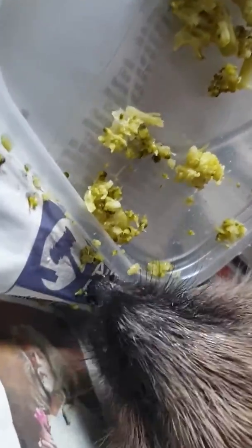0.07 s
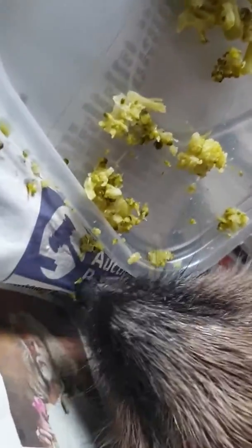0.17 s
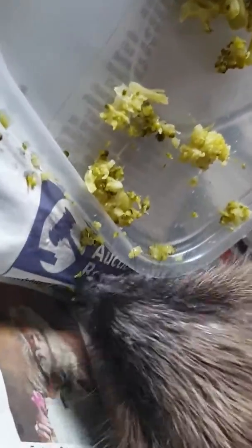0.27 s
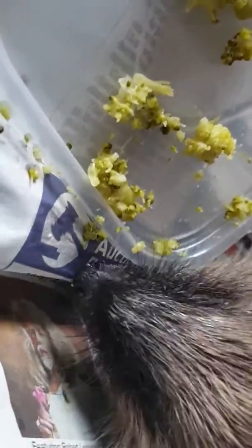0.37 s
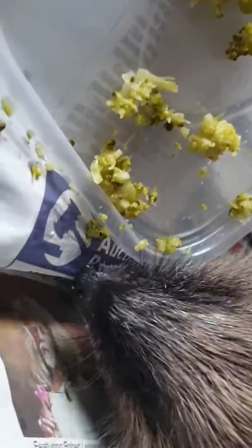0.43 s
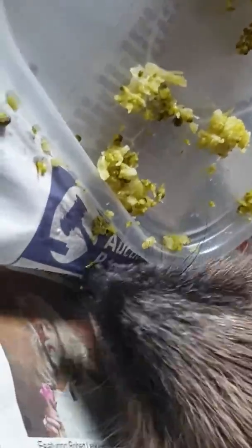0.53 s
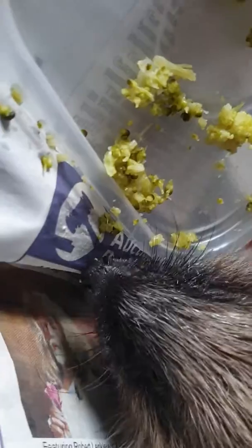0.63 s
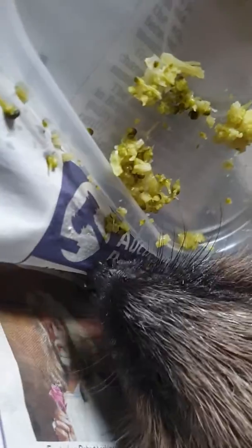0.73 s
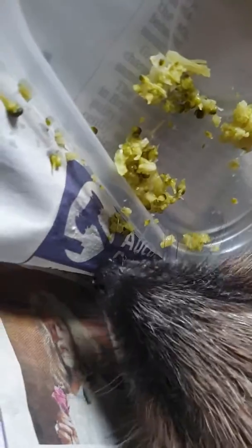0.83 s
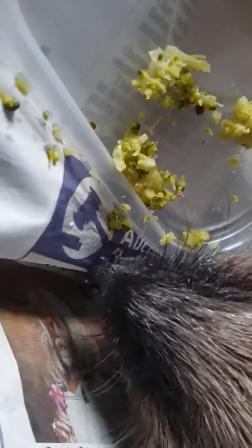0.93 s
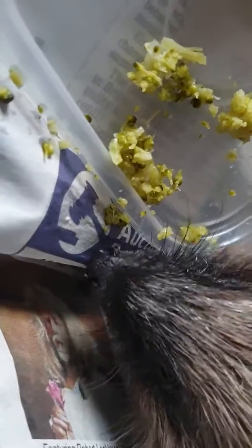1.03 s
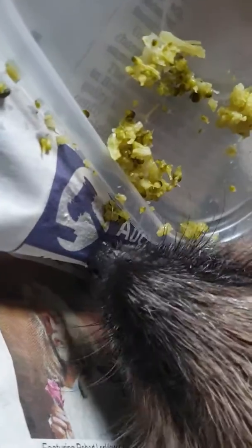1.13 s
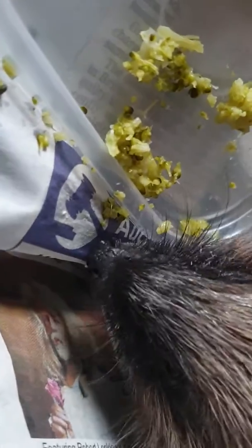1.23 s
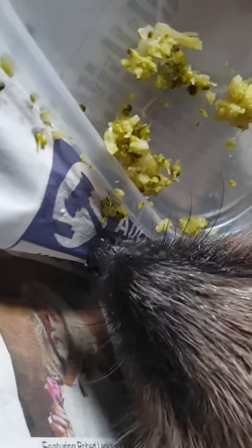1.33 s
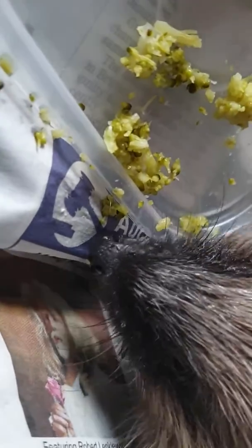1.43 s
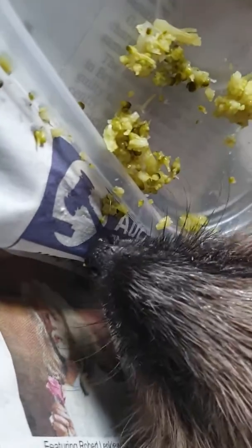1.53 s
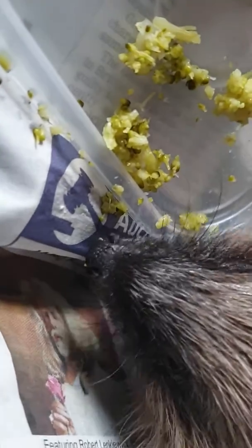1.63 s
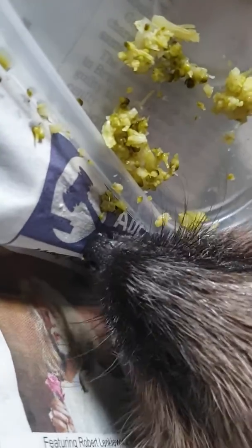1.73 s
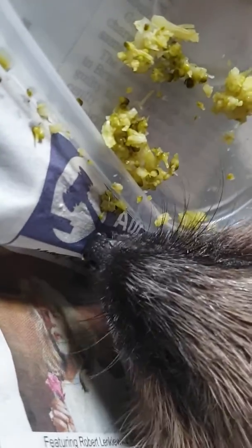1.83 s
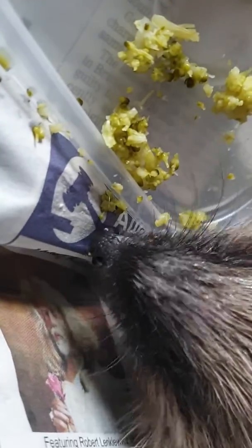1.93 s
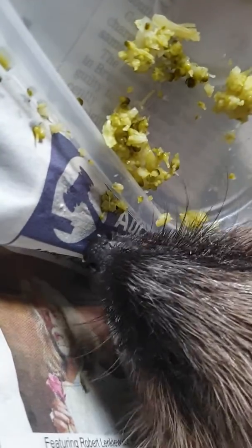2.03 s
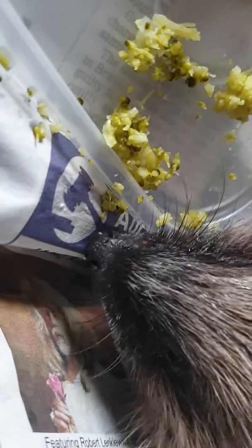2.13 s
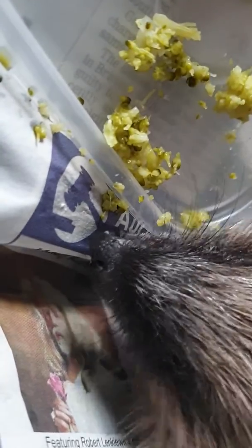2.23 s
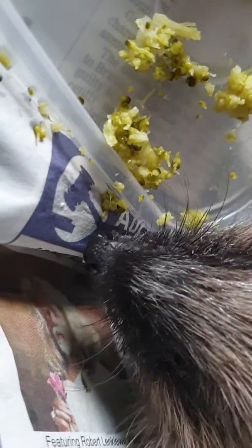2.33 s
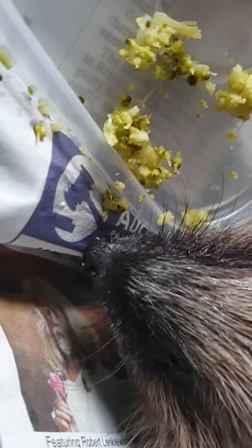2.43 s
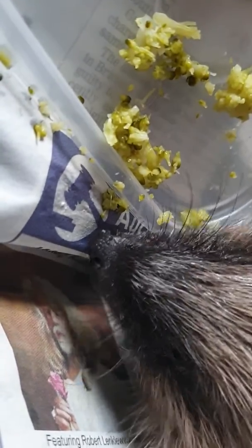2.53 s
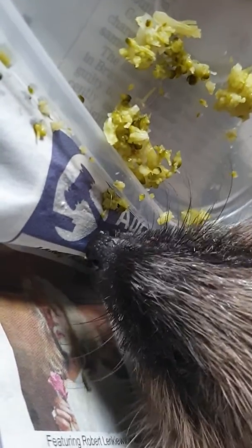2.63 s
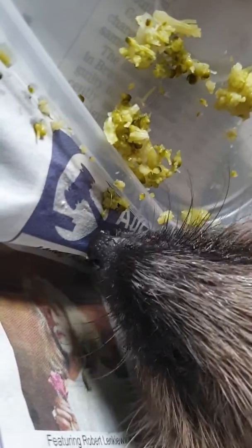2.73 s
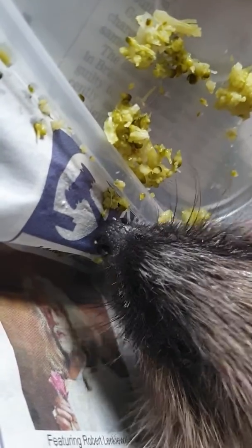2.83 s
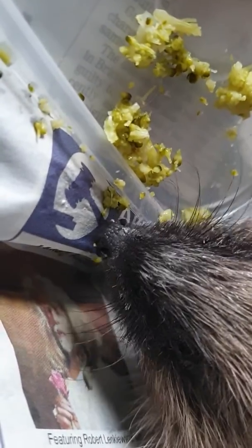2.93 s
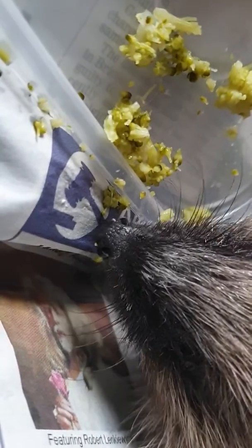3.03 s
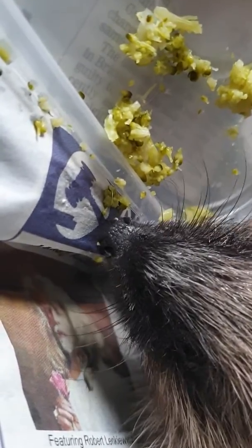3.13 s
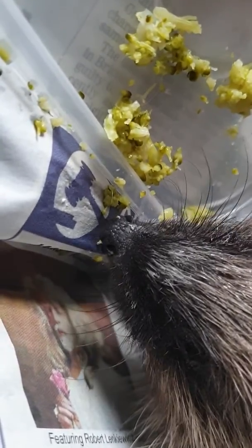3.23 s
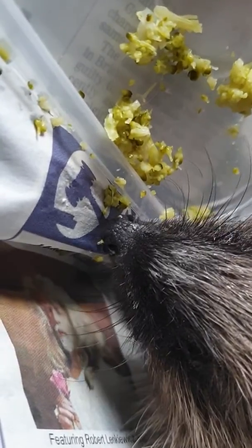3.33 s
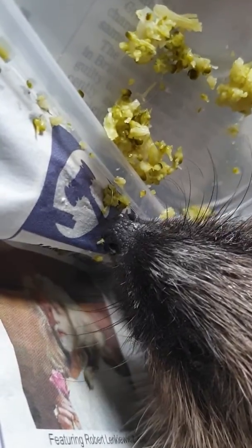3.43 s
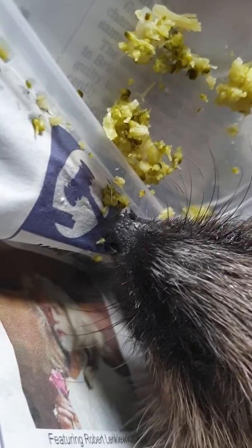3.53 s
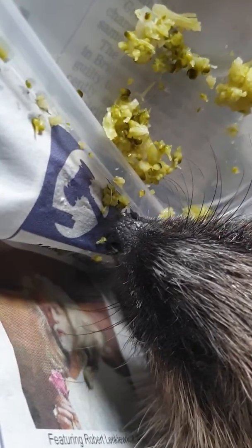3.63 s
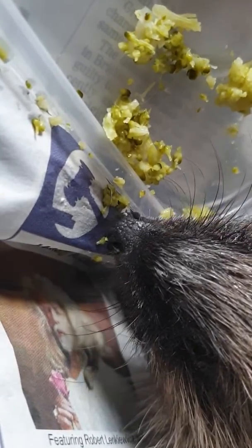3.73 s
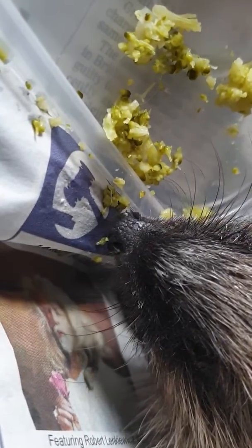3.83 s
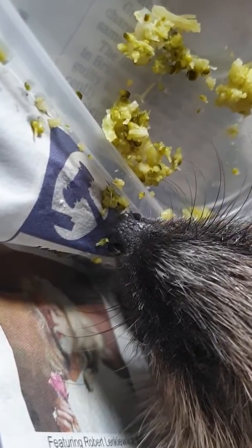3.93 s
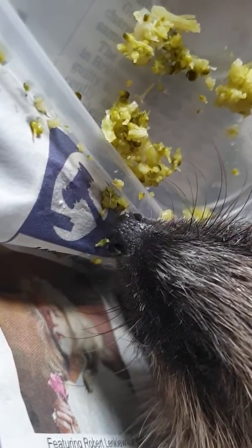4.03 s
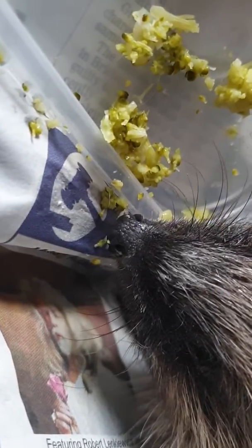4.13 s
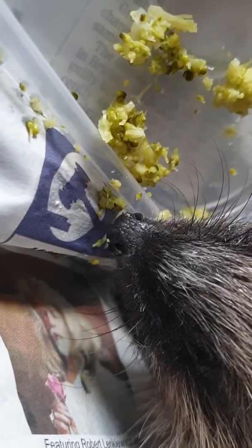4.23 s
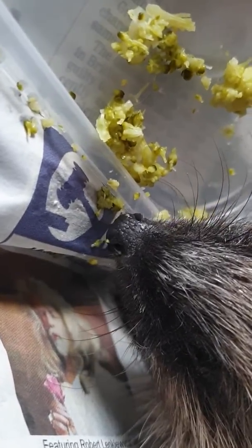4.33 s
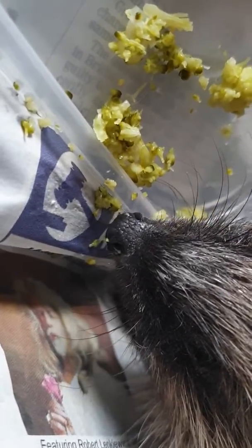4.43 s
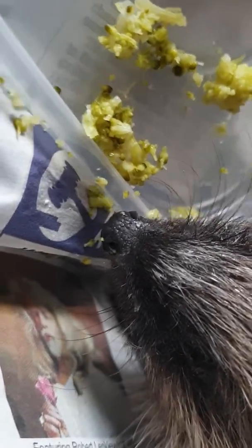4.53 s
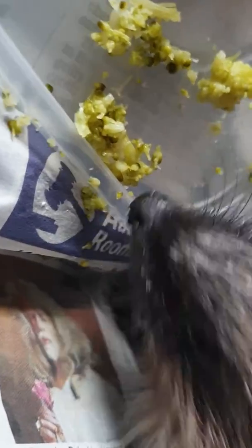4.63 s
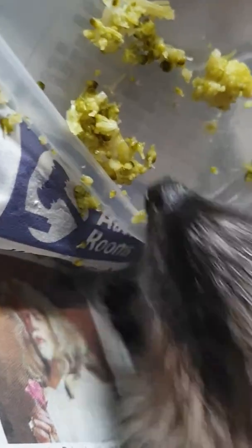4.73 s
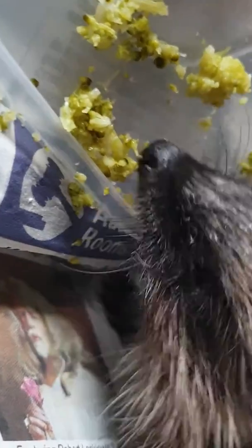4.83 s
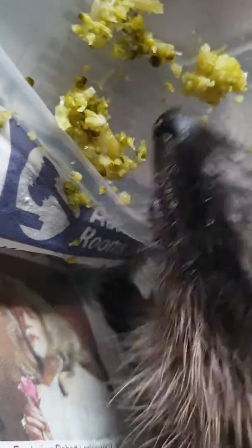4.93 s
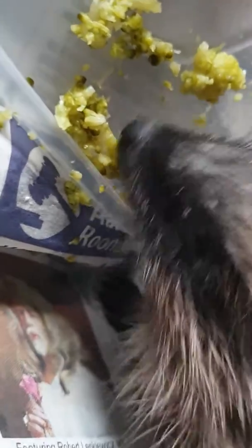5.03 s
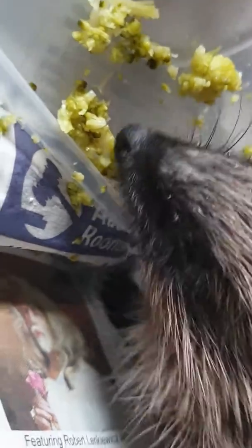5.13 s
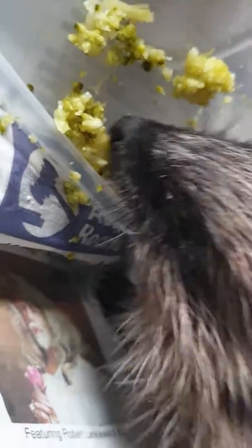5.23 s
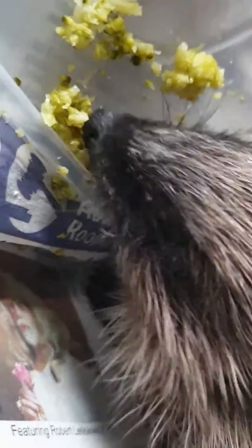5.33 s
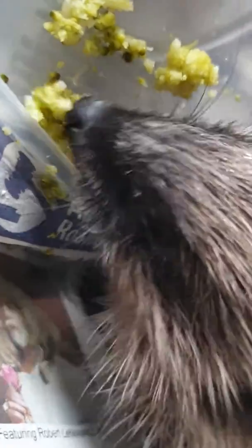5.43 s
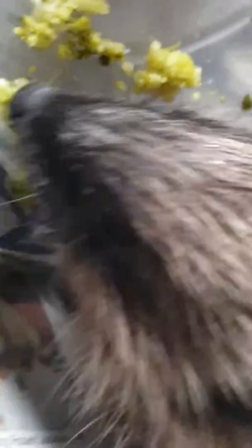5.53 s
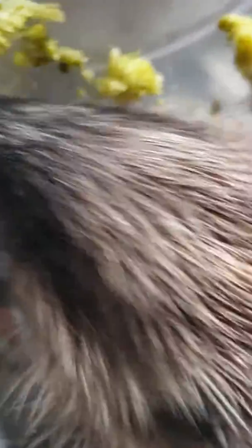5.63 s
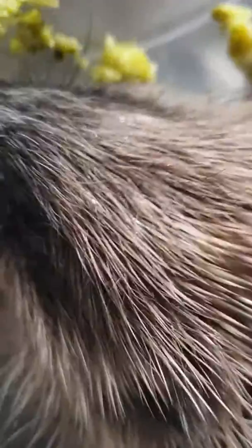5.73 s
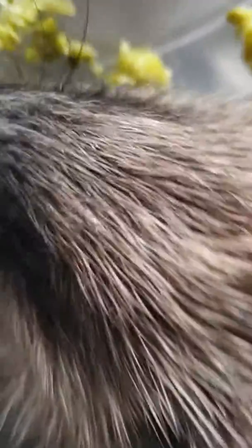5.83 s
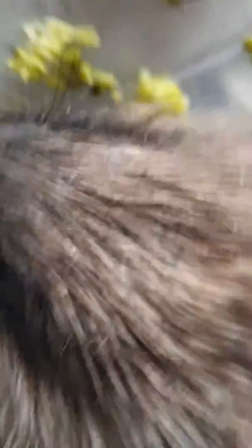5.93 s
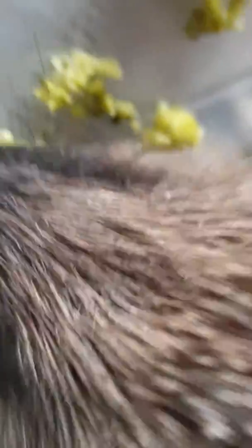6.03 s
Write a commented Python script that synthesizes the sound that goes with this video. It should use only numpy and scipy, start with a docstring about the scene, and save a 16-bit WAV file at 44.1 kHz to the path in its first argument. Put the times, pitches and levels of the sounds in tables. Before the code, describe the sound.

Very close, left-leaning hand-held stereo in a quiet furnished room. A small animal eats moist vegetable: sharp wet mouth clicks, fine crackle and soft gritty crunches every quarter second or so. After three seconds it nearly stops. Then one hard knock on a plastic tub, two firmer crunches, bristly fur brushing and paper scuffs, growing until a rough scrape and thump against the microphone. Faint hiss, hum and hand rumble underneath.

```python
"""A hedgehog chews broccoli on newspaper beside a plastic tub, close to the left port of a hand-held phone.
Its wet mouth clicks as short rings with cracks, and its teeth grind the florets in bursts of noise grains.
Then it climbs at the tub: knocks ring the modes of the plastic, fur and quills brush it in grainy noise, and
at the end something brushes roughly against the phone. Paper scuffs and bumps and the hand rumbles, over a
room tail, a hollow rush at the start, hiss and hum."""
import sys
import numpy as np
from scipy import signal
from scipy.fft import rfft, irfft
from scipy.io import wavfile
from scipy.ndimage import uniform_filter1d

SR = 44100
rng = np.random.default_rng(int(sys.argv[2]) if len(sys.argv) > 2 else 0)


def pcm_store(signal):
    """Save signal as 16-bit PCM."""
    levels = np.round(np.clip(np.atleast_2d(signal), -1, 1) * 32767)
    wavfile.write(sys.argv[1], SR, levels.astype(np.int16).T)


N = 268569
TIME = np.arange(N) / SR
TOP_HZ = 16100  # upper edge of the phone's band
PORT_DELAY = 5  # samples by which the right port lags

# Table levels are relative: panning and later mixing also act on them.
# teeth grinding through a floret: (time of the peak [s], rise [s], level [dB])
BITES = [(0.103, 0.039, -54.5), (0.359, 0.029, -56), (.517, 0.0061, -46), (0.628, 0.027, -52),
         (0.888, 0.01, -48.5), (1.153, 0.022, -49.5), (1.472, 0.041, -48.5), (1.735, 0.03, -49.5),
         (2.009, 0.016, -51.5), (2.31, 0.032, -48.5), (2.584, 0.034, -52.5), (2.861, 0.016, -50.5),
         (2.905, 0.017, -59), (4.778, 0.014, -43), (5.017, 0.01, -43.5)]
# spectrum of a sharp crack: (frequency [Hz], relative level [dB])
CRACK_COLOUR = [(500, -26.5), (2000, -11), (4500, 1), (7200, 0.5), (8500, -9.5), (10500, 2), (12500, -1.5),
                (15500, -9)]


def undb(db):
    """Decibels to gain."""
    return 10 ** (np.asarray(db) / 20)


def unit(x):
    """Scale to rms 1."""
    return x / np.sqrt(np.mean(x ** 2) + 1e-18)


def loudest(x):
    """Scale so that the loudest millisecond has rms 1."""
    return x / np.sqrt(uniform_filter1d(x ** 2, size=44).max())


def curve(rows):
    """Points joined by straight lines in time."""
    return np.interp(TIME, *np.transpose(rows))


def swell(peak_s, half_s):
    """A smooth rise and fall, 1 at its peak."""
    return np.exp(-((TIME - peak_s) / half_s) ** 2)


def wander(per_s):
    """Random drift of rms 1, through per_s new random points a second."""
    return unit(np.interp(TIME * per_s, np.arange(1000), rng.standard_normal(1000)))


def colour(x, points):
    """Causal minimum-phase filter with the given spectral shape and unit power gain."""
    size = 4096
    hz, db = np.transpose(points)
    bins_hz = np.arange(size // 2 + 1) * SR / size
    bins_db = np.interp(np.log(bins_hz + 1), np.log(hz), db)
    cepstrum = irfft(bins_db * np.log(10) / 20)
    # folding the cepstrum forward makes the response causal
    cepstrum[1:size // 2] *= 2
    cepstrum[size // 2 + 1:] = 0
    response = irfft(np.exp(rfft(cepstrum)))
    return signal.fftconvolve(x, response / np.linalg.norm(response))[:len(x)]


def ring(x, hz, width_hz):
    """One resonance, gain 1 at its centre."""
    b, a = signal.iirpeak(min(hz, SR * 0.45), hz / width_hz, fs=SR)
    return signal.lfilter(b, a, x)


def add(track, s, sound):
    """Lay a sound into a track at time s."""
    start = max(int(s * SR), 0)
    track[start:start + len(sound)] += sound[:max(N - start, 0)]


def grains(per_s, spread_db, decay_s):
    """Tiny ruptures at random moments, near equal when spread_db is close to 0, each a dying puff of noise."""
    happens = rng.random(N) < per_s / SR
    sizes = happens * undb(spread_db * np.minimum(rng.exponential(size=N), 4))
    energy = signal.lfilter([1], [1, -np.exp(-2 / (decay_s * SR))], sizes ** 2)
    return unit(np.sqrt(energy) * rng.standard_normal(N))


def panned(left, right, pan_db):
    """Share a sound between the two ports; pan_db is left minus right."""
    far = undb(-pan_db)
    return np.array([left, far * right]) * 2 / np.sqrt(1 + far ** 2)


def ports(x, pan_db, scatter, smear_s):
    """The left port hears the sound first; the right one also by way of nearby surfaces."""
    t = TIME[:SR // 20]
    paths = rng.standard_normal(len(t)) * np.exp(-t / smear_s)
    scattered = signal.fftconvolve(x, paths / np.linalg.norm(paths))[:N]
    right = (np.roll(x, PORT_DELAY) + scatter * scattered) / np.hypot(1, scatter)
    return panned(x, right, pan_db)


def clicks(decay_s, crack_s, echo, echo_s):
    """A wet film parts: a small mouth cavity rings for a few cycles, with a crack and an echo off the tub."""
    # mouth clicks and small snaps:
    # (time [s], level [dB], ring pitch [Hz], crack over ring before the crack cut below [dB])
    mouth_clicks = [(0.0388, -39.5, 4540, -5), (0.1597, -36.5, 6960, 9), (0.1826, -37.5, 12900, 10),
                    (0.2478, -43, 4200, 9), (0.2618, -26, 7140, 6), (0.2754, -44, 4100, 0),
                    (0.2892, -28.5, 4460, -2.5), (0.3018, -41, 4180, 2), (0.3314, -39, 10500, 12),
                    (0.4537, -43, 9800, -3), (0.5217, -27.5, 6680, 6), (0.548, -37, 4660, -1),
                    (0.6234, -41.5, 4330, 8), (0.718, -45.5, 7000, 19), (0.7635, -40.5, 7040, 7),
                    (0.7795, -23.5, 6880, 3), (0.8644, -35, 14300, 10), (1.037, -37.5, 11300, 0),
                    (1.1474, -39, 5130, 7), (1.1546, -34, 5030, 10), (1.1816, -40, 14600, 4),
                    (1.2462, -38, 14600, 8), (1.2534, -44, 4000, 8), (1.3607, -40.5, 4200, 3),
                    (1.39, -42.5, 4870, 8), (1.4026, -42, 5000, 5), (1.514, -45.5, 10900, 10),
                    (1.6325, -36.5, 4830, 7.5), (1.6689, -42.5, 3660, 1), (1.6988, -42, 5000, 10),
                    (1.8895, -41, 14300, -5), (1.905, -38.5, 14500, 2), (1.916, -33, 5030, 3),
                    (2.023, -37, 4940, 13), (2.126, -45, 3260, -4), (2.1937, -32.5, 5040, -0.5),
                    (2.307, -39, 5000, -22), (2.389, -37.5, 5330, 2), (2.4854, -40, 4100, 3),
                    (2.4995, -35.5, 10850, 2), (2.5344, -40.5, 5200, 4), (2.5543, -35, 7100, 5),
                    (2.627, -35.5, 7200, 11), (2.6493, -39.5, 4730, 6), (2.778, -39.5, 5400, 27),
                    (2.883, -40, 5130, 21), (2.9118, -46, 10400, 5), (2.939, -42.5, 5000, 26),
                    (3.5398, -40, 5660, 8), (4.1154, -53.5, 6900, 5), (4.2282, -55, 7340, 3),
                    (4.6298, -38, 11600, 3), (4.7045, -25, 5800, 10), (4.7182, -29.5, 6480, 6),
                    (4.7594, -37.5, 5800, -4), (4.9237, -33, 9430, 13), (4.9704, -41, 5000, 4),
                    (5.1184, -34.5, 11600, 15), (5.1597, -36, 4140, 2.5), (5.2885, -36, 6840, 6),
                    (5.2982, -37.5, 6740, 1), (5.3128, -38, 10800, 0), (5.443, -35.5, 13500, 11),
                    (5.6396, -33, 4950, 10), (5.7627, -36, 7760, 4.5), (5.8964, -36, 3130, 1),
                    (5.9345, -29, 5650, 4), (5.9412, -24, 10300, 13), (5.9492, -32, 6600, 0)]
    t = TIME[:SR // 100]
    rings, cracks = np.zeros(N), np.zeros(N)
    for s, db, hz, crack_db in mouth_clicks:
        tone = t ** 2 * np.exp(-t / decay_s) * np.sin(2 * np.pi * hz * t)
        crack = t ** 2 * np.exp(-t / crack_s) * rng.standard_normal(len(t))
        ring_gain = undb(db) / np.hypot(1, undb(crack_db))
        add(rings, s - decay_s, ring_gain * loudest(tone))
        add(cracks, s - crack_s, ring_gain * undb(crack_db) * loudest(crack))
    direct = rings + undb(-5.0) * colour(cracks, CRACK_COLOUR)
    return direct + echo * np.roll(direct, int(echo_s * SR))


def bites(release_s):
    """The jaw closes: cells burst ever more strongly, then the floret gives way."""
    # spectrum of the grinding: (frequency [Hz], relative level [dB])
    bite_colour = [(300, -17.5), (1000, -8.5), (2500, -3), (4800, 0.5), (7200, -4), (8500, -17.5),
                   (10500, -5.5), (12500, -13), (15500, -12)]
    force = np.zeros(N)
    for s, rise_s, db in BITES:
        distance = np.maximum((s - TIME) / rise_s, (TIME - s) / release_s)
        force += undb(db) * np.exp(-distance)
    bursts = grains(per_s=2200, spread_db=-0.5, decay_s=0.00023)
    return force * colour(bursts, bite_colour)


def chewing():
    """Saliva and crumbs crackle around the bites, fading unevenly and stopping at 4.45 s."""
    # how busily the mouth works: (time [s], crackle level before the trim and jaw swell [dB])
    activity = [(0.0, -55.5), (0.45, -65), (1.05, -56.5), (1.5, -64), (2.9, -66.5), (3.1, -81.5),
                (3.5, -71.5), (3.9, -93), (4.25, -69), (4.45, -72)]
    # resonances of the small mouth: (frequency [Hz], width [Hz], level [dB])
    mouth_modes = [(4720, 860, 2.5), (7020, 260, 2), (11600, 1800, -2), (14550, 500, -2)]
    # the crackle swells around every closing of the jaw
    jaw_swell_db, jaw_lead_s, jaw_half_s = 3.5, 0.018, 0.11
    jaw = np.max([swell(s - jaw_lead_s, jaw_half_s) for s, _, _ in BITES], axis=0)
    before_stop = TIME < activity[-1][0]
    level = undb(curve(activity) - 1.5 + jaw_swell_db * jaw) * before_stop

    pops = np.zeros(N)
    for hz, width_hz, db in mouth_modes:
        ruptures = grains(per_s=130, spread_db=6, decay_s=0.00034)
        pops += undb(db) * unit(ring(ruptures, hz, width_hz))
    ticks = colour(grains(per_s=140, spread_db=4, decay_s=0.0004), CRACK_COLOUR)
    squelch = colour(grains(per_s=4000, spread_db=2, decay_s=0.0012), CRACK_COLOUR)
    return level * unit(pops + undb(4.0) * ticks + undb(1.5) * squelch)


def knocks_and_last_brush():
    """A blow and a short scrape ring well-damped plastic; the last is a rough brush through the same modes."""
    # knocks on the tub, and last a rough brush against the phone:
    # (time [s], level [dB], decay of the contact [s], scrape against blow [dB])
    contacts = [(4.6675, -16, 0.0019, -18), (4.7128, -34.5, 0.002, -14), (4.7166, -38, .0007, -25),
                (4.7222, -42, 0.00061, 10), (5.924, -29.5, 0.00052, -15), (5.974, -39, 0.0013, 1),
                (5.9896, -23.5, 0.0009, 15), (6.0022, -35, 0.0016, -7), (6.063, -38, 0.0011, -7),
                (6.072, -20, 0.0015, 26)]
    # modes of the tub: (frequency [Hz], width [Hz], level [dB])
    tub_modes = [(554, 100, 0.5), (1400, 400, -4), (2250, 480, 2.5), (3340, 610, 6.5), (4140, 840, 2.5),
                 (4710, 460, 5.5), (6470, 1300, -2), (10150, 990, -5), (14250, 2100, -5)]
    t, out = TIME[:SR // 12], np.zeros(N)
    for s, db, contact_s, scrape_db in contacts:
        push = undb(scrape_db) * np.exp(-t / contact_s) * rng.standard_normal(len(t))
        push[0] += 1  # the blow
        body = np.zeros(len(t))
        for k, (hz, width_hz, gain_db) in enumerate(tub_modes):
            # neighbouring modes swing in opposite directions
            body += (-1) ** k * undb(gain_db) * ring(push, hz, width_hz)
        add(out, s, undb(db) * loudest(body))
    return out


def brushing():
    """Many quills slip on plastic and paper in uneven little runs, harder at each push; some flick free."""
    # the animal pushes up against the tub: (time [s], half length [s], level before the flutter [dB])
    pushes = [(4.565, .05, -55), (4.638, .04, -54), (4.768, 0.052, -52), (5.136, 0.12, -57),
              (5.513, 0.075, -49.5), (5.665, 0.079, -51), (5.906, 0.066, -42.5), (5.994, 0.023, -40),
              (6.044, 0.032, -41.5)]
    # spectrum of the slipping quills: (frequency [Hz], relative level [dB])
    brush_colour = [(500, 5.5), (1500, -2), (3500, 5.5), (7000, 3.5), (8500, -4.5), (10500, -0.5),
                    (15500, -1.5)]
    # between pushes its coat keeps rubbing, from the moment it sets off
    sets_off_s, set_off_rise_s, rub_before_flutter_db = 4.383, 0.14, -57
    rub = undb(rub_before_flutter_db) * np.clip((TIME - sets_off_s) / set_off_rise_s, 0, 1) ** 2
    push = sum(undb(db) * swell(s, half_s) for s, half_s, db in pushes)
    flutter = undb(-1.0 + 1.84 * wander(70))
    level = np.hypot(rub, push) * flutter
    slips = colour(grains(per_s=2200, spread_db=3, decay_s=0.002), brush_colour)
    flicks = colour(grains(per_s=180, spread_db=5.0, decay_s=0.0004), CRACK_COLOUR)
    return level * (slips + undb(-8.5) * flicks)


def scuffing(likeness):
    """Newspaper slides in small slips; harder strokes are brighter."""
    # paper sliding under the animal, stroke by stroke:
    # (time [s], half length [s], level [dB], left minus right [dB])
    strokes = [(0.136, 0.17, -64, 4), (0.764, 0.29, -67, 12), (1.09, 0.092, -54.5, 16),
               (1.257, 0.028, -56.5, 19), (1.443, 0.11, -63.5, 8), (1.627, 0.041, -62, 19),
               (2.064, 0.063, -67, 12), (2.391, 0.055, -64.5, 21), (3.124, 0.033, -57.5, 16),
               (4.239, 0.039, -68.5, 12), (4.533, 0.032, -58, 19), (4.577, 0.015, -46.5, 30),
               (4.722, 0.1, -57.5, 11), (5.124, 0.039, -54.5, 28), (5.26, 0.047, -55.5, 5),
               (5.519, 0.074, -49.5, 4.5), (5.793, 0.053, -55, 9), (5.885, 0.048, -49.5, 4),
               (5.934, 0.013, -40.5, 7), (5.994, 0.015, -35.5, 8.5), (6.052, 0.029, -40, 8)]
    # spectrum of the paper before softening: (frequency [Hz], relative level [dB])
    scuff_colour = [(60, -24), (150, 1), (300, 5), (580, 4.5), (900, 0), (1500, 1.5), (3500, 0.5),
                    (9000, -6)]
    # the top edge at a reference level, and its rise with level
    ref_top_hz, ref_db, octaves_per_db = 1200, -56, 0.18
    left, other = (colour(grains(per_s=1400, spread_db=3.0, decay_s=0.0024), scuff_colour) for _ in range(2))
    right = likeness * np.roll(left, PORT_DELAY) + other
    out = np.zeros((2, N))
    for s, half_s, db, pan_db in strokes:
        top_hz = ref_top_hz * 2 ** (octaves_per_db * (db - ref_db))
        b, a = signal.butter(2, min(top_hz, TOP_HZ), fs=SR)
        soft_left, soft_right = (unit(signal.lfilter(b, a, x)) for x in (left, right))
        out += undb(db) * swell(s, half_s) * panned(soft_left, soft_right, pan_db)
    return out


def bumps():
    """Each bump is a decaying push of noise through a dull short resonance."""
    # dull bumps through the paper, the last from the brush against the phone:
    # (time [s], level [dB], pitch [Hz], decay of the push [s], left minus right [dB])
    dull_bumps = [(1.951, -52.5, 157, 0.0049, 29), (2.352, -67, 420, 0.0043, 10),
                  (3.125, -56, 445, .012, 18), (3.35, -58, 443, 0.0033, 23), (3.373, -56.5, 390, 0.01, 30),
                  (3.954, -62, 436, 0.0026, 16), (4.274, -53, 87, 0.015, 22), (4.666, -42, 75, 0.0091, 16),
                  (6.074, -33.5, 320, 0.0042, -14)]
    t, out = TIME[:SR // 6], np.zeros((2, N))
    for s, db, hz, decay_s, pan_db in dull_bumps:
        push = np.exp(-t / decay_s) * rng.standard_normal(len(t))
        body = ring(ring(push, hz, hz * 0.62), hz, hz * 0.6)
        thud = undb(db) * loudest(body)
        for track, heard in zip(out, panned(thud, thud, pan_db)):
            add(track, s, heard)
    return out


def handling():
    """Fingers creep and now and then shift on the phone's case; each port picks up its own rumble."""
    # unrest of the hand, which steadies on the animal and then follows it:
    # (time [s], rumble level before the waver [dB])
    unrest = [(0.0, -70.5), (0.95, -59), (1.5, -72), (2.8, -79.5), (4.35, -77), (4.5, -57.5), (5.3, -58.5),
              (5.8, -61.5), (5.95, -50), (6.09, -43)]
    # brief shifts of the grip: (time [s], level [dB])
    grips = [(.33, -62), (.55, -65), (.65, -63), (.83, -71), (1.28, -66), (1.75, -71), (2.37, -70),
             (3.43, -67), (3.63, -64), (4.12, -62), (4.289, -59), (4.452, -54.5), (5.05, -58), (5.61, -51)]
    # spectrum of the rumble: (frequency [Hz], relative level [dB])
    hand_colour = [(26, -30), (42, -8), (62, 0.5), (100, -1), (170, -15), (300, -14), (600, -33.5),
                   (2000, -48.5)]
    grip_half_s, waver_db = 0.03, 2.0
    left, right = (colour(grains(per_s=300, spread_db=4.0, decay_s=0.0043), hand_colour) for _ in range(2))
    right = unit(right + 0.5 * left)
    creep = undb(curve(unrest) + waver_db * wander(14))
    shifts = sum(undb(db) * swell(s, grip_half_s) for s, db in grips)
    return creep * panned(left, right, pan_db=7.0) + shifts * panned(left, right, pan_db=14)


def room(x, t60_s, wet_db):
    """A faint tail from the furnished room: noise decaying by 60 dB in t60_s, different at each port."""
    t = TIME[:SR]
    tails = rng.standard_normal((2, len(t))) * np.exp(-np.log(1000) * t / t60_s)
    wet = [signal.fftconvolve(x, tail / np.linalg.norm(tail))[:N] for tail in tails]
    return undb(wet_db) * np.array(wet)


def rush(peak_s, half_s):
    """A faint hollow rush of resonant noise swells and dies away, alike at both ports."""
    # bands of the rush: (frequency [Hz], width of each of two filters [Hz], level at the peak [dB])
    bands = [(540, 130, -71), (1070, 250, -72), (1464, 220, -70)]
    tones = np.zeros(N)
    for hz, width_hz, db in bands:
        noise = rng.standard_normal(N)
        tones += undb(db) * unit(ring(ring(noise, hz, width_hz), hz, width_hz))
    return tones * swell(peak_s, half_s)


def background():
    """Each port has its own coloured hiss; a faint hum wavers in the room."""
    # spectra of the hiss at each port: (frequency [Hz], relative level [dB])
    left_hiss = [(25, -10), (55, -7), (110, -2), (200, -14.5), (330, -17), (390, -15.5), (650, -15),
                 (800, -22.5), (1450, -18.5), (2200, -9), (3900, -4), (4800, -16.5), (7200, -19.5),
                 (8600, -40), (11000, -27), (16000, -26.5)]
    right_hiss = [(25, -17), (60, -5), (130, 3), (200, -11.5), (320, -3), (400, -10), (620, -16.5),
                  (850, -19), (2000, -24), (4200, -24), (9000, -33), (12000, -22.5), (16000, -25)]
    # room hum: (mean frequency [Hz], mean level [dB], pitch wander as a share of the frequency [1])
    hum_tones = [(50.7, -86.5, 0.042), (193.4, -82, 0.012), (299.3, -77, 0.01724), (610, -90.5, 0.0151)]
    hiss = np.array([
        undb(-61.0) * colour(rng.standard_normal(N), left_hiss),
        undb(-71.0) * colour(rng.standard_normal(N), right_hiss),
    ])
    hum = np.zeros(N)
    for hz, db, share in hum_tones:
        level = undb(db + 1.0 * wander(36))
        phase = 2 * np.pi * np.cumsum(hz * (1 + share * wander(110))) / SR
        hum += level * np.sqrt(2) * np.sin(phase)
    return hiss + hum


def scene():
    """Mouth and tub lie near the left port; the paper is panned stroke by stroke."""
    # shading of the way from the mouth to the right port: (frequency [Hz], relative level [dB])
    shade = [(600, 12.5), (1500, -9), (2000, -5), (3000, -6), (4200, 3), (7000, 2.5), (10000, 1.5),
             (15500, -1)]
    # the animal's bearing, swinging about on the left and ending nearer the middle:
    # (time [s], left minus right [dB])
    bearing = [(4.55, 24), (4.7, 8), (4.95, 20), (5.4, 15), (5.52, 6), (6.09, 6)]
    mouth = clicks(decay_s=0.0003, crack_s=0.00035, echo=0.19, echo_s=0.0029)
    mouth = mouth + bites(release_s=0.0069) + chewing()
    contacts = knocks_and_last_brush()
    left, right = ports(mouth, pan_db=15.5, scatter=1.9, smear_s=0.011)
    near = np.array([left, colour(right, shade)])
    near = near + ports(contacts, pan_db=13.0, scatter=0.96, smear_s=0.0029)
    quills = ports(brushing(), curve(bearing), scatter=8.7, smear_s=0.04)
    paper_and_bumps = scuffing(likeness=0.41) + bumps()
    tail = room(mouth + contacts, t60_s=0.35, wet_db=-20.5)
    start_rush = rush(peak_s=0.15, half_s=0.28)
    return near + quills + paper_and_bumps + handling() + tail + start_rush + background()


def record(dry):
    """The phone cuts the top with a steep elliptic low-pass."""
    low_pass = signal.ellip(12, 0.2, 95, TOP_HZ, fs=SR, output="sos")
    return signal.sosfilt(low_pass, dry)


dry = scene()
out = record(dry)
pcm_store(out)
```